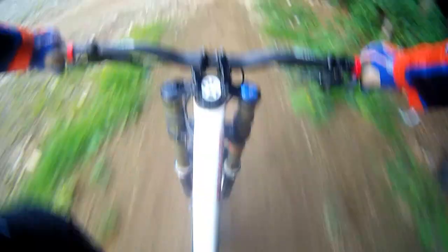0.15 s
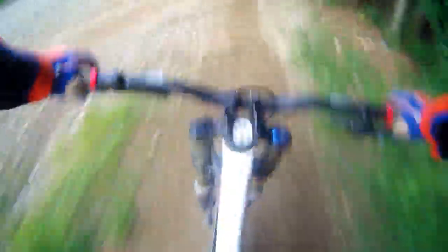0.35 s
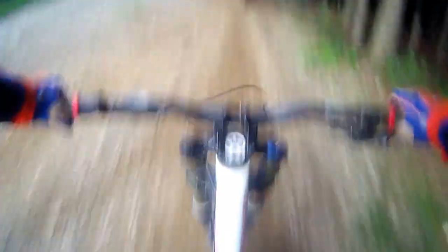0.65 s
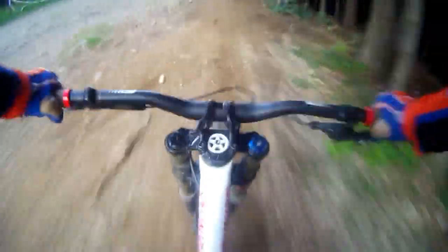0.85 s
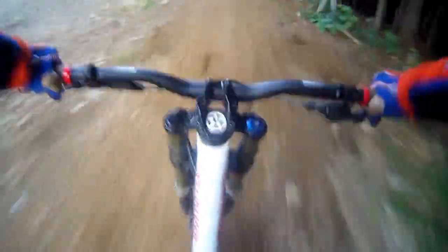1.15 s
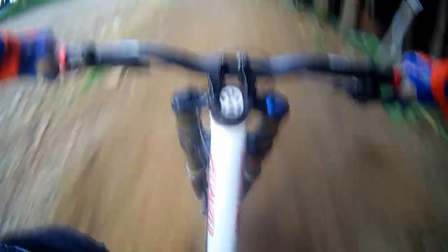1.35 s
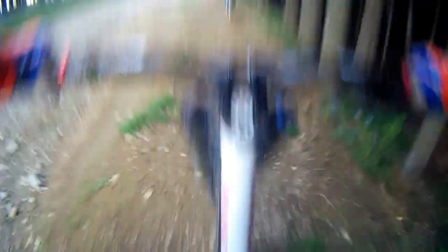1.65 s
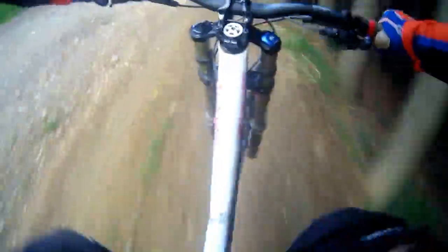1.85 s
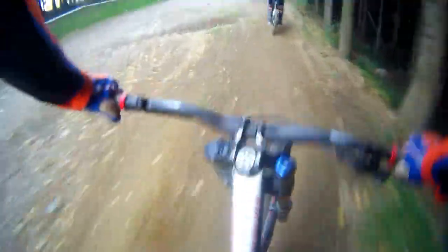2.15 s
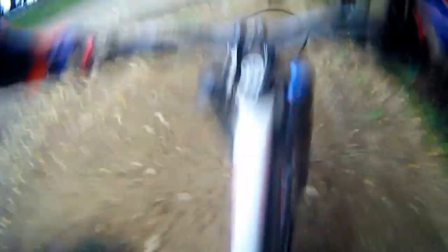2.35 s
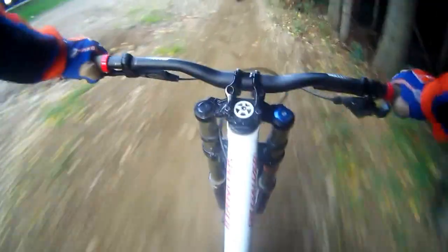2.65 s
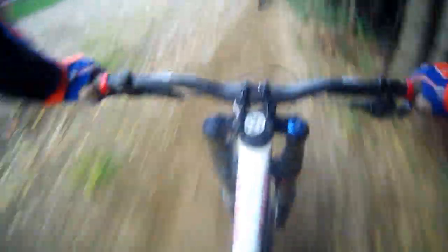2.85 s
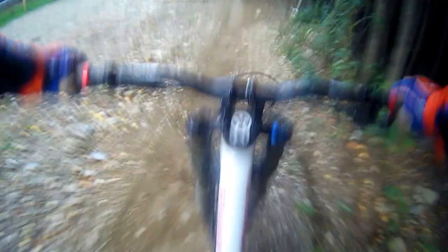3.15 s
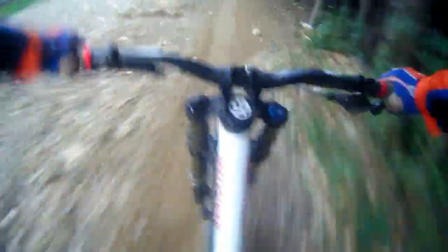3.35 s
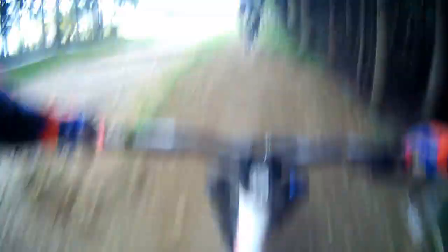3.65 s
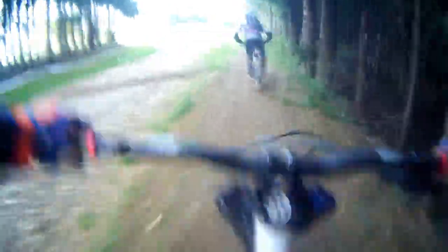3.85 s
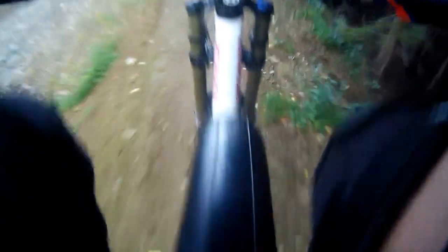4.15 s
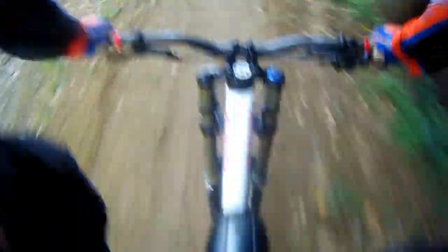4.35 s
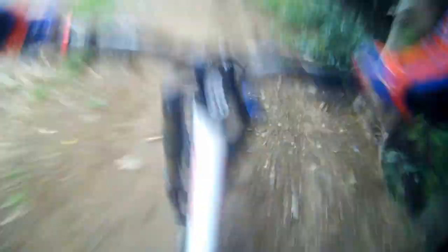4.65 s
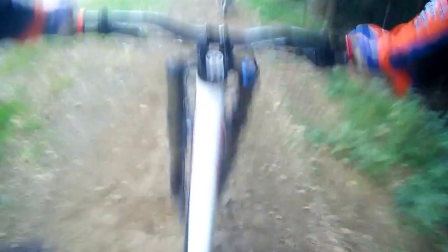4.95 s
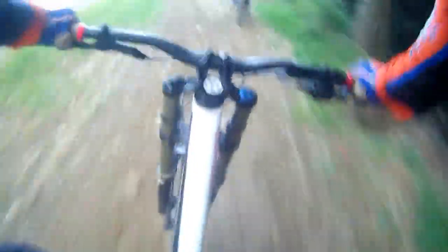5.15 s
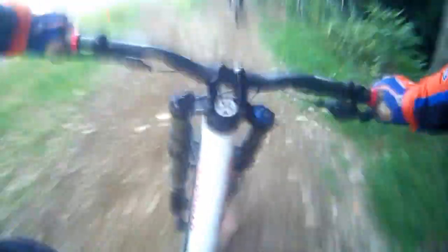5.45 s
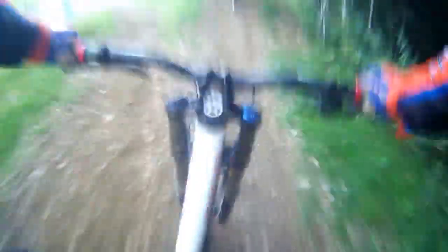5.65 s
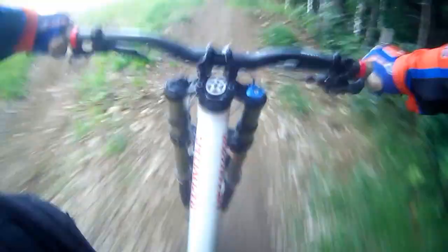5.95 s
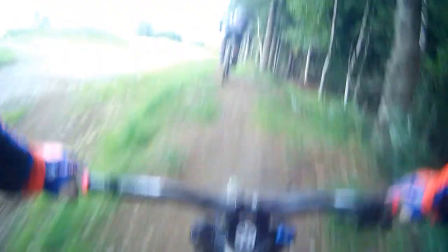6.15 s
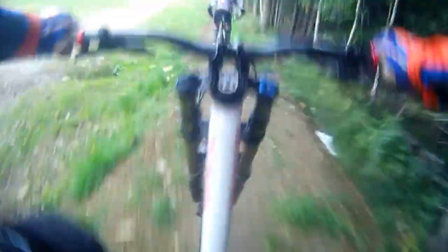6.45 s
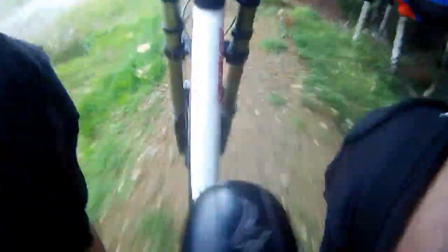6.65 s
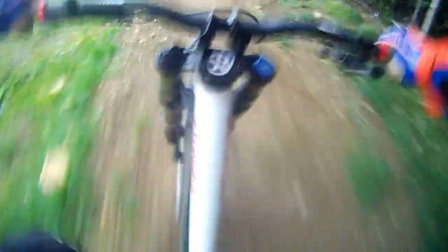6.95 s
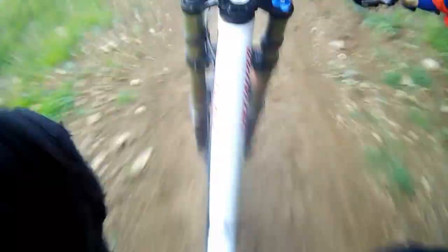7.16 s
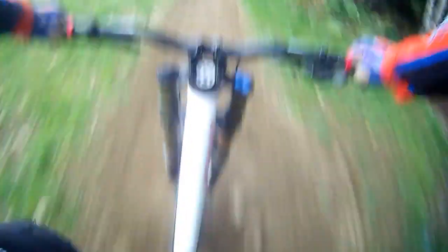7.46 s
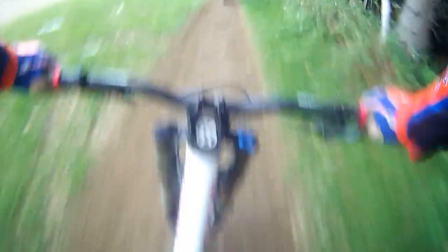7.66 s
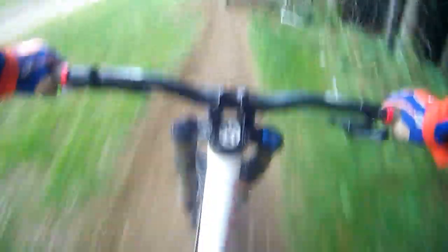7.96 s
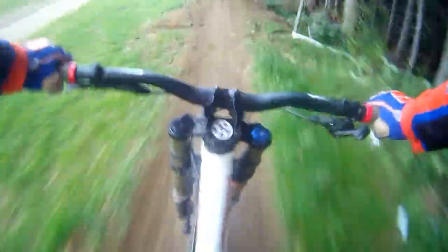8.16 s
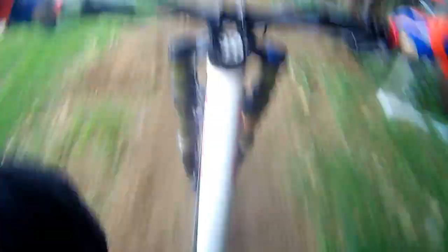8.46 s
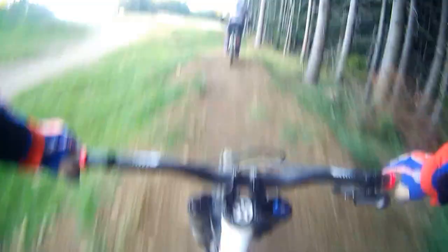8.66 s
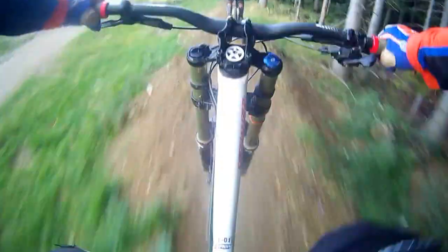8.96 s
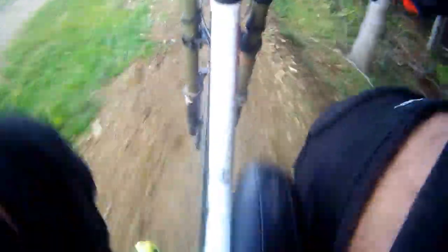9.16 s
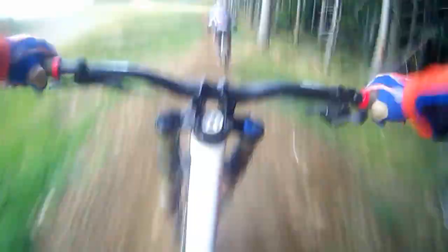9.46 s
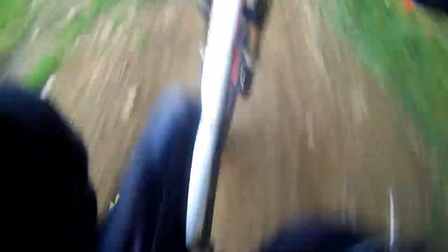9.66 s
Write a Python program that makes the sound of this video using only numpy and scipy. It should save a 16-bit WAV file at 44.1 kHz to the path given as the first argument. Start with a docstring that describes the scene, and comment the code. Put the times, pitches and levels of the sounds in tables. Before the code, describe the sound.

Close on a rider's chest, a hard plastic camera housing clacks and chatters with every bump of a fast dirt trail, roughly twenty irregular knocks a second at the busiest. Gritty tyre hiss and low wind buffeting sit behind. The rattle thins during short jumps, bright dirt scuffs mark touchdowns, and the hardest knocks crack and distort. Open air, no echo.

```python
"""A rough dirt trail, ridden fast on a mountain bike, heard from a camera in a plastic housing on the rider's chest.
Every bump knocks the housing about: it chatters as it slides, then clacks through its resonances and rebounds.
Many knocks overload the converter. Behind them, shaped noise makes tyres on grit and low wind on the case.
Noise through narrow resonances makes two thin squeals, likely brakes.
The fine rattle sinks in each jump; four bright scuffs are tyres biting the dirt."""
import sys
import numpy as np
from scipy import signal
from scipy.fft import rfft, irfft
from scipy.io import wavfile

SR = 44100
rng = np.random.default_rng(int(sys.argv[2]) if len(sys.argv) > 2 else 0)


def wav_record(signal):
    """Record a signal, one row per channel, as 16-bit PCM in the file named by sys.argv[1]."""
    frames = np.transpose(np.atleast_2d(signal))
    bounded = np.clip(frames, -1, 1)
    # unit amplitude maps onto the largest positive 16-bit level
    quanta = np.round(bounded * 32767).astype(np.int16)
    wavfile.write(sys.argv[1], SR, quanta)


N = 432180
TIME_S = np.arange(N) / SR


def from_db(db):
    """Decibels to amplitude gain."""
    return 10 ** (np.asarray(db) / 20)


def rms_one(x):
    """Scale to unit power."""
    return x / np.sqrt(np.mean(x ** 2) + 1e-20)


def panned(pan_db):
    """Left and right gains, pan_db apart (positive is left), with a mean of one."""
    gains = from_db(np.array([[pan_db], [-pan_db]]) / 2)
    return gains / gains.mean()


def drift(rate_hz):
    """Random values at rate_hz joined by straight lines; rms 1."""
    knots = rng.standard_normal(int(N / SR * rate_hz) + 2)
    return rms_one(np.interp(TIME_S * rate_hz, np.arange(len(knots)), knots))


def swell(start_s, end_s):
    """A quick rise that slows towards 1 midway, then the mirrored fall."""
    corners_s = np.linspace(start_s, end_s, 5)
    return np.sqrt(np.interp(TIME_S, corners_s, [0, .5, 1, .5, 0]))


def stereo_noise(likeness):
    """White noise, partly shared by the two channels (likeness 1 is mono)."""
    shared = np.clip(likeness, 0, 1)
    mid, side = rng.standard_normal((2, N))
    return np.sqrt(1 + shared) * mid + np.sqrt(1 - shared) * side * [[1], [-1]]


def coloured(x, spectrum):
    """Give a white signal a smooth spectrum that falls away below its first point; rms 1."""
    hz, db = np.transpose(spectrum)
    bins_hz = np.maximum(np.fft.rfftfreq(N, 1 / SR), 1)
    curve_db = np.interp(np.log(bins_hz), np.log(hz), db, right=-100)
    low_cut = 1 / np.hypot(1, (hz[0] / bins_hz) ** 2)
    return rms_one(irfft(rfft(x) * from_db(curve_db) * low_cut, N))


def ring(force, hz, width_hz):
    """A unit push starts a dying sine of height about 1; little sound comes off far below that pitch."""
    radius = np.exp(-np.pi * width_hz / SR)
    angle = 2 * np.pi * hz / SR
    leak = np.exp(-angle / 2)
    resonance = [1, -2 * radius * np.cos(angle), radius * radius]
    poles = np.convolve(resonance, [1, -leak])
    height = radius * np.sin(angle) * (1 + leak) / 2
    return np.diff(signal.lfilter([height], poles, force + 1e-18), prepend=0)


# wind on the case, spectrum shape: pitch_hz [Hz], level_db [relative dB per Hz]
WIND_SPECTRUM = [(20, 8), (35, -3), (60, -6.5), (100, -7), (180, -26.5), (350, -26), (700, -24.5),
                 (1500, -66)]


def wind(rumble_db, gust_db=2.5):
    """Eddies and jolts buffet the case in low lumps."""
    eddies = stereo_noise(likeness=0.64) * from_db(gust_db * drift(7.8))
    return from_db(rumble_db + 1.5) * panned(-3.0) * coloured(eddies, WIND_SPECTRUM)


# likely brake squeals: start_s [s], end_s [s], pitch_hz [Hz], level_db [dB at the height of the swell]
BRAKE_SQUEALS = [(4.752, 5.29, 14800, -57), (6.203, 6.255, 4800, -47)]


def brake(width_hz=420):
    """A dragging pad makes the disc whistle, high and unsteady: noise through two equal resonances."""
    rub = stereo_noise(likeness=.8)
    out = np.zeros((2, N))
    for start_s, end_s, hz, db in BRAKE_SQUEALS:
        whistle = ring(ring(rub, hz, width_hz), hz, width_hz)
        out += from_db(db) * swell(start_s, end_s) * rms_one(whistle)
    return out


# hiss of the tyres along the trail: time_s [s], level_db [dB before the trim and the fall in flight]
TYRE_HISS = [(0.0, -60.5), (0.27, -57), (0.52, -55.5), (0.79, -51.5), (1.09, -58), (1.47, -52.5),
             (1.74, -60.5), (2.81, -54.5), (3.41, -50.5), (3.79, -51.5), (4.07, -59), (4.31, -55.5),
             (4.56, -51.5), (5.73, -52), (5.87, -55), (6.58, -61), (6.85, -58.5), (7.01, -52), (7.4, -55.5),
             (7.67, -47), (7.97, -59), (8.43, -52), (8.79, -57.5), (9.11, -58), (9.61, -52.5), (9.8, -51)]
# tyres on grit, spectrum shape: pitch_hz [Hz], level_db [relative dB per Hz]
GRIT_SPECTRUM = [(300, 0.5), (600, 6.5), (1000, -7), (1900, 6.5), (2500, -1), (4200, -4), (5400, -1.5),
                 (6600, -13), (8200, -15), (9200, -21.5), (10300, -23.5), (12500, -31), (16000, -48)]


def tyres(airborne, grain_db=2.5, surge_db=2.0, flight_db=-1.5):
    """Knobs crush grit in tiny bursts, with the odd surge of loose dirt."""
    time_s, level_db = np.transpose(TYRE_HISS)
    hiss_db = np.interp(TIME_S, time_s, level_db) + flight_db * airborne
    grit = stereo_noise(likeness=0.66)
    burst_db = grain_db * drift(900) + surge_db * drift(45)
    crunch = grit * from_db(burst_db)
    return from_db(hiss_db + 6.5) * panned(4.7) * coloured(crunch, GRIT_SPECTRUM)


# tyres scuffing the dirt: start_s [s], end_s [s], level_db [dB at the height of the swell]
TOUCHDOWNS = [(2.123, 2.31, -46.5), (4.223, 4.418, -53.5), (6.81, 7.06, -43.5), (9.323, 9.48, -37)]
# the scuff, spectrum shape: pitch_hz [Hz], level_db [relative dB per Hz]
SCUFF_SPECTRUM = [(3000, 17), (5800, 10.5), (11000, -13), (16000, -28)]


def landings(grain_db=3.0):
    """The tyres bite again and throw fine dirt."""
    grains = stereo_noise(likeness=0.87) * from_db(grain_db * drift(270))
    spray = coloured(grains, SCUFF_SPECTRUM)
    level = sum(from_db(db) * swell(start_s, end_s) for start_s, end_s, db in TOUCHDOWNS)
    return panned(4.4) * spray * level


# both wheels off the ground: start_s [take-off, s], end_s [touch-down, s]; a row of no length is silent
JUMPS = [(0.07, 0.18), (2.39, 2.5), (4.12, 4.31), (6.62, 6.83), (9.1, 9.1)]


def flight():
    """How far the bike is into the air: 0 on the ground, 1 midway through a jump."""
    return sum(swell(start_s, end_s) for start_s, end_s in JUMPS)


# Contacts of the housing are rows of start_s, level_db, thud_db (extra lows), edge_db (extra highs).
# one knock per bump: start_s [s], strength_db [dB before the trim], chatter_db [dB of the chatter around it]
BUMP_KNOCKS = [(0.0122, -20, -33.5), (0.0572, -29, -30.5), (0.1918, -19.5, -41), (0.2594, -12, -32.5),
               (0.3201, -25, -46), (0.361, -5.5, -23), (0.4119, -15.0, -26.0), (0.4567, 0.5, -17.5),
               (0.5124, -13.0, -26), (0.56, 0, -22.5), (0.616, -11.5, -22), (0.6587, -1.5, -22.0),
               (0.7045, -29, -34), (0.7204, -21, -32), (0.783, -18.5, -33), (0.91, -5.5, -15.0),
               (0.956, -15.0, -27), (0.9849, -13, -32), (1.0678, -18, -39), (1.0959, -16.5, -32),
               (1.121, -18.5, -35), (1.1757, -9.0, -23), (1.22, -27.0, -37), (1.2361, -13.5, -31),
               (1.2742, -7, -23.5), (1.3153, -20.5, -43), (1.3691, -17, -36.5), (1.3899, -25, -38),
               (1.4142, -20.5, -29.5), (1.5118, -14, -29), (1.5623, -8.5, -17.5), (1.602, -0.5, -15),
               (1.6546, -21, -29), (1.7073, -17.5, -26), (1.7725, -25, -56), (1.836, -17, -37.5),
               (1.883, -23.5, -44), (1.919, -21, -39), (1.9599, -13.5, -31.5), (2.0183, -21.5, -46),
               (2.0656, -11.5, -31.5), (2.1843, -9, -28.5), (2.21, -17.5, -29), (2.2362, -20, -26),
               (2.258, -32, -28.5), (2.2905, -8, -26), (2.334, -41, -36), (2.3697, -22, -34),
               (2.531, -21, -30.5), (2.6176, -27, -36), (2.6718, -24, -36), (2.7294, -4, -28.5),
               (2.7827, -26.0, -35), (2.8107, -29, -59), (2.86, -2.5, -14.5), (2.9199, -15, -16.5),
               (2.9791, -6.5, -24), (3.0371, -14, -21.0), (3.0897, -7, -19.5), (3.1513, -30, -23),
               (3.198, 0.0, -24.5), (3.2555, -14.0, -22), (3.3019, -7, -19.5), (3.3394, -2.5, -19.5),
               (3.3778, -9, -20), (3.4119, -19.0, -28), (3.4466, 1.5, -17), (3.4905, -21, -32.5),
               (3.541, -7, -29.5), (3.5935, -13.5, -22.5), (3.6346, -24, -21.5), (3.7227, -13, -28),
               (3.7583, -16, -34.5), (3.7778, -19, -45), (3.806, -14, -22.5), (3.8427, -11, -20),
               (3.876, -18.0, -34.5), (3.9268, -10.5, -17.5), (3.9799, -4.0, -19), (4.0463, -18.5, -17),
               (4.1044, -22.0, -33), (4.3267, -18.5, -39.0), (4.3658, -5.5, -11.5), (4.431, -11.0, -22.5),
               (4.4946, -21, -30), (4.55, -11.5, -20), (4.6086, -5.5, -17.5), (4.657, -32, -47),
               (4.689, -16.5, -53), (4.7175, -36, -45), (4.7682, -11.5, -14.5), (4.8095, -3, -20.5),
               (4.8552, -6.5, -17.5), (4.9042, 2, -16), (4.9634, -11.5, -21), (5.008, -10, -19),
               (5.049, -22, -36), (5.0791, -10, -24), (5.1491, -7.5, -21), (5.2075, 2, -14.5),
               (5.2832, -11, -30.5), (5.3322, -6.0, -24.5), (5.3855, -6.5, -15), (5.4372, -1, -21.0),
               (5.4907, -8, -19.5), (5.5367, 0.5, -20.5), (5.5883, -11.0, -16.5), (5.6294, -10.5, -19.5),
               (5.6882, -17, -26), (5.73, -13.5, -24), (5.7475, -11.5, -31.5), (5.791, -17, -21.5),
               (5.8217, -13.5, -21), (5.8807, -11, -36), (5.9205, -16, -25.5), (5.9949, -11, -29),
               (6.0952, -24, -48.0), (6.168, -5, -29), (6.2143, -17, -30.5), (6.301, -10.5, -19),
               (6.4118, -30, -35.5), (6.4495, -8, -21.5), (6.5242, -18.5, -34), (6.6196, -30.5, -36),
               (6.8924, -11, -18), (6.948, -10, -23.5), (6.973, -8.5, -29.5), (7.0053, 3, -12.5),
               (7.0678, -15, -16.5), (7.1135, -38, -27.5), (7.2064, -18, -19), (7.2794, -9, -30.5),
               (7.3212, -26.0, -31.5), (7.4116, -26, -27.5), (7.4607, 2.5, -25.5), (7.514, -15, -21.5),
               (7.559, -8, -22.5), (7.6118, -14.5, -21), (7.6614, -5.5, -26), (7.7005, -16, -32),
               (7.7466, -4.0, -13), (7.8006, -11, -18.5), (7.8573, -3.5, -22), (7.9407, -18.5, -24.0),
               (8.0012, -18, -29), (8.0987, -21, -35), (8.1292, -24, -37.5), (8.1482, -39, -31),
               (8.2068, -15, -31.5), (8.245, -9, -20.5), (8.2929, 1.0, -20), (8.3338, -32, -36),
               (8.3522, -18, -33), (8.387, -13, -23.5), (8.4276, -16, -37), (8.4752, -2, -25.5),
               (8.5721, -7.5, -32), (8.624, -22, -28), (8.659, -27.0, -36), (8.6778, -28, -32),
               (8.7363, -15, -31), (8.845, -22, -31), (9.001, -27.0, -36.5), (9.079, -17, -32),
               (9.3969, -17, -19), (9.4569, 5.5, -19), (9.477, -6, -34), (9.5114, -1.5, -12.5),
               (9.55, 1, -15.5), (9.656, -14, -24), (9.702, -9, -21.5), (9.7581, -21.0, -34),
               (9.777, -28, -34.5), (9.7942, -25, -25)]


def knocks(knock_db=-0.5, edge_vary_db=1.0):
    """Each bump throws the case against its stop; softer or more chattery ones thud more, hard ones are brighter."""
    start_s, strength_db, chatter_db = np.transpose(BUMP_KNOCKS)
    thud_db = 2.5 - 0.34 * strength_db + 0.28 * chatter_db
    # brightness grows above a strength of -9 dB
    edge_db = -2 + 0.52 * np.maximum(strength_db + 9, 0)
    edge_db = edge_db + edge_vary_db * rng.standard_normal(len(start_s))
    return np.transpose([start_s, strength_db + knock_db, thud_db, edge_db])


def shaking(hits, felt_s=0.044, weight_per_db=0.89):
    """How hard the ground shakes the rider, in dB above smooth flight: nearby bumps add by weight."""
    start_s, db, thud_db, _ = hits.T
    coarse_s = np.linspace(0, N / SR, 2000)
    nearness = np.exp(-.5 * ((coarse_s[:, None] - start_s) / felt_s) ** 2)
    felt = nearness / (felt_s * np.sqrt(2 * np.pi))
    weight = from_db(weight_per_db * (db + thud_db))
    return np.interp(TIME_S, coarse_s, 20 * np.log10(1 + felt @ weight))


def fine_rattle(rattle_db, per_s, spread_db, thud_db, edge_db):
    """Countless small tremors from the ground keep the housing buzzing; returns contacts."""
    chance, size = rng.random(N), rng.standard_normal(N)
    at = np.flatnonzero(chance < per_s / SR)
    db = rattle_db[at] + spread_db * np.clip(size[at], -2, 2)
    return np.transpose([at / SR, db, np.full(len(at), thud_db), np.full(len(at), edge_db)])


def chatter(hits, lead_s, lag_s, slide_db, rebound_db, clean, spread_db, thud_db, edge_db, count=6):
    """Sliding before each knock and rebounds after it, thickest near the knock; returns contacts."""
    start_s, strength_db, thud, edge = np.repeat(hits, count, axis=0).T
    db = np.repeat(np.array(BUMP_KNOCKS)[:, 2], count)
    jitter, size = rng.random((len(start_s), 2)).T
    # turn runs from -1 (earliest slide) through 0 (the knock) to 1 (last rebound)
    turn = 2 * (np.arange(len(start_s)) % count + jitter) / count - 1
    before = turn < 0
    delay_s = turn * np.sqrt(abs(turn)) * np.where(before, lead_s, lag_s)
    # before a hard knock the case flies almost free
    slide = slide_db - clean * np.maximum(strength_db + 14, 0)
    db = db + np.where(before, slide, rebound_db) + spread_db * (size - abs(turn))
    return np.transpose([start_s + delay_s, db, thud / 2 + thud_db, edge / 2 + edge_db])


def bounce(sharp, delay_s=0.0006, level_db=-9.5, hardening=1.0):
    """The wall swings back and strikes again one cycle later, the more so in a hard knock."""
    start_s, db, thud_db, edge_db = sharp.T
    again_s = start_s + delay_s * (1 + 0.034 * rng.standard_normal(len(start_s)))
    again_db = db + level_db + hardening * np.minimum(db, 8)
    return np.transpose([again_s, again_db, thud_db - 4, edge_db - 2])


# the dry crack of a hard knock, spectrum shape: pitch_hz [Hz], level_db [relative dB per Hz]
CRACK_SPECTRUM = [(3200, 15), (5600, 8), (7000, -49.5), (11000, -20), (16000, -47)]


def crack(sharp, level_db=-14.0, attack_s=0.00027, decay_s=0.0021):
    """Hard knocks grind the plastic faces together for a few milliseconds."""
    start_s, db, _, edge_db = sharp.T
    gentle_db = .45 * np.minimum(db + 4.5, 0)  # gentle knocks crack less
    blow_db = db + edge_db + level_db + gentle_db
    blows = np.bincount(np.round(start_s * SR).astype(int), from_db(blow_db), N)
    rise, fall = np.exp(-1 / (np.array([attack_s, decay_s]) * SR))
    envelope = signal.lfilter([1 - rise], np.poly([rise, fall]), blows + 1e-18)
    return panned(8.7) * envelope * coloured(stereo_noise(likeness=0.83), CRACK_SPECTRUM)


def pushes(start_s, sizes, roll_off_hz, length=25):
    """Trains of bell-shaped pushes, one per mode; a longer push has its spectrum roll off lower."""
    step = np.arange(length) - length // 2
    bells = np.exp(-.5 * (2 * np.pi * roll_off_hz[:, None] * step / SR) ** 2)
    bells /= bells.sum(axis=1, keepdims=True)
    centre = np.round(start_s * SR).astype(int)
    at = np.clip(centre[:, None] + step, 0, N - 1).ravel()
    return [np.bincount(at, (bells * size[:, None]).ravel(), N) for size in sizes.T]


# modes the housing rings with: pitch_hz [Hz, before the seat shifts it], width_hz [Hz],
# level_db [relative dB], pan_db [left minus right dB, before the seat leans it]
HOUSING_MODES = [(99, 174, -12, -1), (234.4, 190, -19.5, -9), (488, 38, -16.5, 7), (590, 80, -14.5, 7),
                 (840, 130, -13, 7.5), (1270, 250, -10.5, 7), (1640, 260, -2.5, 6.5), (1930, 200, 1.5, 5.7),
                 (2140, 230, -5.5, 5.7), (3130, 90, -16, 5), (3200, 410, -17, 14), (3894, 145, -17, 4.5),
                 (4630, 100, -21.5, 4.5), (5334, 185, -14.5, 7), (7400, 3400, -36, 14)]


def housing(contacts, sign, vary_db=5.5, soft_hz=4600, hardening=0.086, edge_hardening=0.72,
            detune=0.02, seats=3):
    """Each contact lands on a new spot and so shares its force differently among the modes."""
    start_s, db, thud_db, edge_db = contacts.T
    hz, width_hz, mode_db, pan_db = np.transpose(HOUSING_MODES)
    low = np.clip(np.log2(1500 / hz), 0, 1)     # heavy contacts move the whole case
    high = np.clip(np.log2(hz / 2000), 0, .8)   # sharp ones reach the stiff wall modes
    spot_db = vary_db * rng.standard_normal((len(start_s), len(hz)))
    colour_db = np.outer(thud_db, low) + np.outer(edge_db, high)
    sizes = sign[:, None] * from_db(db[:, None] + mode_db + colour_db + spot_db)
    # harder contacts are briefer, so brighter
    hard_db = np.maximum(db + 15, -6)
    roll_off_hz = soft_hz * from_db(hardening * hard_db + edge_hardening * edge_db)
    # the case sits tighter or looser, which shifts its pitch
    seat = rng.integers(0, seats, len(start_s))
    out = np.zeros((2, N))
    for k, tightness in enumerate(np.linspace(-1, 1, seats)):
        here = seat == k
        forces = pushes(start_s[here], sizes[here], roll_off_hz[here])
        for m, force in enumerate(forces):
            lean_db = 1.5 * tightness * (-1) ** m
            mode = ring(force, hz[m] * (1 + detune * tightness), width_hz[m])
            out += panned(pan_db[m] + lean_db) * mode
    return out


# a stone flicked up by the tyre: start_s [s], level_db [strength, dB], thud_db [extra lows, dB],
# edge_db [extra highs, dB]
FLICKED_STONES = [(9.478, -10.5, -25, 20)]


def rattle(hits, rattle_db):
    """Knocks all drive the case against its stop; the lighter contacts push either way."""
    sharp = np.vstack([hits, FLICKED_STONES])
    heavy = np.vstack([sharp, bounce(sharp)])
    slides = chatter(hits, lead_s=.012, lag_s=0.011, slide_db=1.5, rebound_db=3.0, clean=0.55,
                     spread_db=11.5, thud_db=4.5, edge_db=-1.5)
    ticks = fine_rattle(rattle_db, per_s=75, spread_db=8, thud_db=14.5, edge_db=-8)
    either_way = rng.choice([-1, 1], len(slides) + len(ticks))
    sign = np.r_[-np.ones(len(heavy)), either_way]
    return housing(np.vstack([heavy, slides, ticks]), sign) + crack(sharp)


def hollow(x, hz=2500, width_hz=500, depth=.5):
    """The case passes less just above its main resonances: a partial notch."""
    notched = signal.lfilter(*signal.iirnotch(hz, hz / width_hz, fs=SR), x)
    return x + np.clip(depth, 0, 1) * (notched - x)


def scene():
    """Everything travels with the camera, in open air without echoes."""
    hits = knocks()
    shake_db = shaking(hits)
    airborne = flight()
    # both follow the shaking and fall in flight
    rattle_db = -56 + 0.82 * shake_db - 9 * airborne
    rumble_db = -55 + 0.84 * shake_db - 2 * airborne
    through_case = rattle(hits, rattle_db) + tyres(airborne) + landings()
    return hollow(through_case) + wind(rumble_db) + brake()


# resting level of the converter: one row per channel, offset [fraction of full scale]
REST_OFFSET = [
    [-.044],
    [.076],
]


def record(dry):
    """The converter rests off centre, hard knocks overload it, and the top is cut."""
    shifted = dry + REST_OFFSET
    clipped = shifted / (1 + shifted ** 8) ** (1 / 8)
    top_cut = signal.cheby2(12, 60, 16400, fs=SR, output="sos")  # 60 dB down from 16400 Hz
    return signal.sosfilt(top_cut, clipped - REST_OFFSET) + REST_OFFSET


dry = scene()
out = record(dry)
wav_record(out)
```